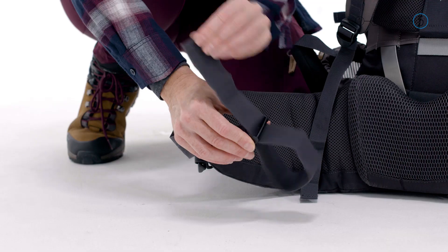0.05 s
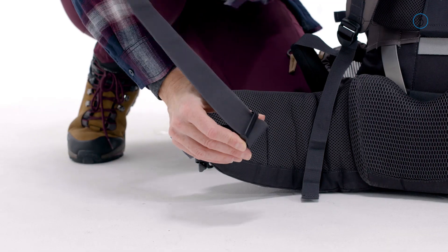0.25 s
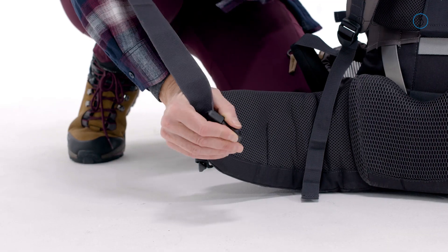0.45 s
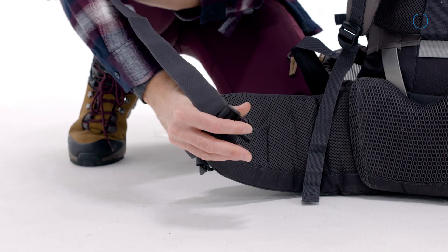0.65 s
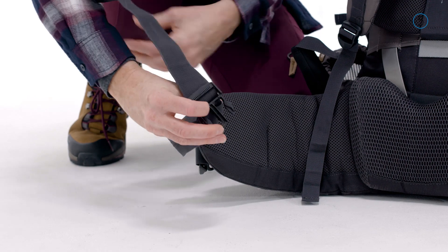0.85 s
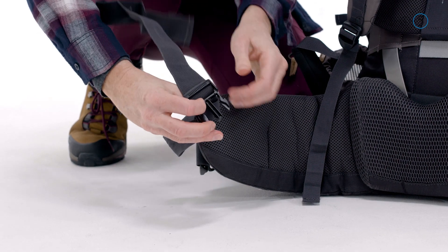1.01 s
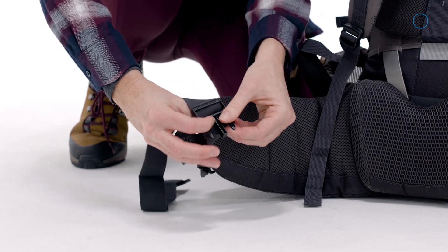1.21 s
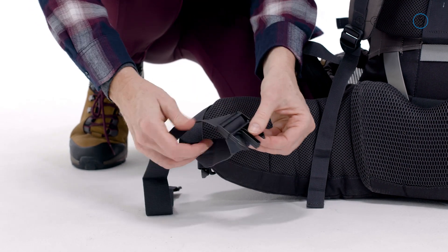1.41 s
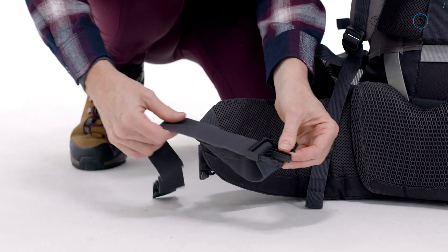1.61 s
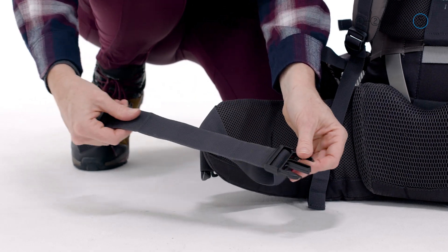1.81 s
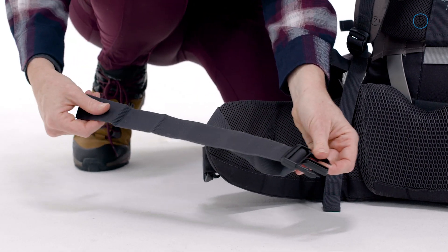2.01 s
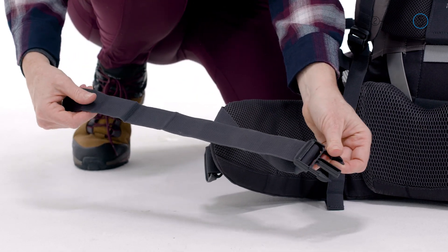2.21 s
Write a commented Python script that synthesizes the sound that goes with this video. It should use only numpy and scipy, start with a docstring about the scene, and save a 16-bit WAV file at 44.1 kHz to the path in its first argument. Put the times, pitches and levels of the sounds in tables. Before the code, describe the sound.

A nylon strap zips through a backpack's plastic buckle, rising in pitch. Dull knocks on padding and faint hand rustling follow, then a slacker pull rasps and ends in small buckle ticks, close by in a dry studio.

```python
"""First comes a quick zip that rises in pitch: a nylon strap pulled tight through the plastic buckle
of a backpack's hip belt, the ribs of its weave ticking over the bar. The strap end flops on the
padding, hands rustle, and a second, slacker pull only rasps and ends with small buckle ticks.
It all happens close by in a dry studio, over a low hum and hiss."""
import sys
import numpy as np
from scipy import signal
from scipy.fft import rfft, irfft
from scipy.io import wavfile
from scipy.ndimage import map_coordinates

SR = 44100
rng = np.random.default_rng(int(sys.argv[2]) if len(sys.argv) > 2 else 0)


def master_out(mix):
    """Clip the mix to full scale and print it as 16-bit PCM to the path in sys.argv[1]."""
    frames = np.transpose(np.atleast_2d(mix))
    ceiling = np.clip(frames, -1, 1)
    pcm = np.round(ceiling * 32767).astype(np.int16)
    wavfile.write(sys.argv[1], SR, pcm)


N = 103635


def undb(db):
    """Turn decibels into a gain."""
    return 10 ** (np.asarray(db) / 20)


def unit(x):
    """Scale a signal to an average power of 1."""
    return x / np.sqrt(np.mean(x ** 2))


def clock():
    """The time of each sample in seconds."""
    return np.arange(N) / SR


def gain_curve(table, column=1, fade_s=.012):
    """A gain that follows a table's dB column and fades out beyond its first and last times."""
    rows, t = np.array(table), clock()
    outside = np.maximum(rows[0, 0] - t, 0) + np.maximum(t - rows[-1, 0], 0)
    return undb(np.interp(t, rows[:, 0], rows[:, column])) * np.exp(-outside / fade_s)


def colour(x, points):
    """Shape the bass and treble along (Hz, dB) points; white noise keeps its power."""
    size = 4096
    hz, db = np.array(points).T
    gain = undb(np.interp(np.log(np.fft.rfftfreq(size, 1 / SR) + 1), np.log(hz), db))
    # These steps make a filter that never rings before the sound arrives.
    cepstrum = irfft(np.log(unit(gain)))
    cepstrum[1:size // 2] *= 2
    cepstrum[size // 2 + 1:] = 0
    return signal.fftconvolve(x, irfft(np.exp(rfft(cepstrum))))[:N]


def wander(per_s):
    """A smooth random curve, about 1 in size, through per_s new values a second."""
    values = rng.standard_normal(4096)
    return unit(map_coordinates(values, [clock() * per_s], order=2, mode="mirror"))


def fibres(spread_db, hiss, snaps_per_s=5000):
    """Many tiny fibre snaps of uneven size over a smooth hiss."""
    hits = rng.random(N) < snaps_per_s / SR
    signs = np.sign(rng.standard_normal(N))
    sizes = undb(spread_db * np.minimum(rng.exponential(size=N), 4))
    return unit(unit(hits * signs * sizes) + hiss * rng.standard_normal(N))


# The tone of the rumble and hiss. Each row: frequency in Hz, relative level in dB.
BACKGROUND_COLOUR = [(25, -15), (42, -9), (56, -6), (80, -4), (130, 0.5), (220, -5), (350, -10), (550, -17),
                     (900, -18), (2000, -18), (4000, -22), (8000, -20.5), (12000, -23), (15500, -20)]

def background(hum_hz=100, hum_db=-56.5, noise_db=-54.5):
    """A steady hiss, a low rumble and a slightly wavering hum."""
    hum_gain = np.sqrt(2) * undb(hum_db + 0.6 * wander(12))
    hum = hum_gain * np.sin(2 * np.pi * hum_hz * clock() + .25 * wander(9))
    return hum + undb(noise_db) * colour(rng.standard_normal(N), BACKGROUND_COLOUR)


# Early echoes off the floor and the pack. Each row: delay in seconds, level in dB.
ECHOES = [(.0037, -22), (.0078, -19), (0.0151, -16)]

def room(x, ring_s=.24, gap_s=.007, tail_db=-19, top_hz=5500):
    """Add a few quick echoes and a short, soft tail from the studio's floor and walls."""
    t = clock()
    early = sum(undb(db) * np.interp(t - delay, t, x, left=0) for delay, db in ECHOES)
    age = t[:SR // 2]
    tail = rng.standard_normal(len(age)) * (age > gap_s) * np.exp(-np.log(1000) * age / ring_s)
    tail = signal.sosfilt(signal.butter(1, top_hz, fs=SR, output="sos"), tail)
    tail /= np.sqrt(np.sum(tail ** 2))
    return x + early + undb(tail_db) * signal.fftconvolve(x, tail)[:N]


# Hands and sleeves on fabric. Each row: time in seconds, brushing level in dB, rubbing level in dB.
HANDLING = [(0.42, -54.5, -42.5), (0.51, -55.5, -52), (0.55, -55, -60.5), (0.64, -52.5, -53),
            (0.70, -57.5, -57.5), (0.81, -56, -61), (0.85, -60, -62), (0.90, -56, -61), (1.0, -65.5, -67),
            (1.11, -65, -61.5), (1.19, -66, -64), (1.228, -58, -63), (1.26, -63, -58.5), (1.33, -55, -58),
            (1.41, -54.5, -54.5), (1.43, -50, -57.5), (1.50, -50.5, -54), (1.555, -45.5, -58),
            (1.615, -49.5, -59.5), (1.672, -42.5, -56), (1.705, -50.5, -55), (1.80, -51, -63)]
# The tones of bright brushing and dull rubbing. Each row: frequency in Hz, relative level in dB.
BRUSH_COLOUR = [(80, -12), (150, 3.5), (300, -7), (1000, -3.5), (1700, 0.5), (2400, 0), (3600, -3),
                (6500, -9), (10000, -17), (15500, -22.5)]
RUB_COLOUR = [(60, -25), (150, -7), (310, 0), (500, -2), (750, -1), (1150, -2), (1700, -14), (4000, -35)]

def hands():
    """Fingers brush along the strap while sleeves and padding rub more dully."""
    brush = fibres(spread_db=2.5, hiss=0.95) * undb(1.24 * wander(80)) * gain_curve(HANDLING)
    rub = fibres(spread_db=3.5, hiss=0.44) * undb(1.5 * wander(59.8)) * gain_curve(HANDLING, column=2)
    return colour(brush, BRUSH_COLOUR) + colour(rub, RUB_COLOUR)


# Brief squeaks. Each row: middle in seconds, level in dB, pitch in Hz, half length in seconds,
# wobble as a share of the pitch.
SQUEAKS = [(0.899, -52.5, 2300, 0.0063, 0.18), (1.551, -47, 2400, 0.008, 0.07),
           (2.093, -54, 13800, .009, 0.05), (2.19, -59, 13300, .006, .02), (2.26, -53.5, 2150, 0.013, .03)]

def squeaks():
    """The strap sticks and slips on the plastic in thin, unsteady chirps."""
    out, waver = np.zeros(N), wander(1100)
    for middle, db, hz, half, wobble in SQUEAKS:
        swell = np.sqrt(2) * undb(db) * np.exp(-((clock() - middle) / half) ** 2)
        out += swell * np.sin(2 * np.pi * hz * np.cumsum(1 + wobble * waver) / SR)
    return out


# Ticks of the buckle. Each row: start in seconds, level in dB, fading time in seconds.
TICKS = [(0.072, -38, 0.0019), (1.839, -40, .002), (2.092, -35.5, .005), (2.183, -44, .006),
         (2.232, -39.5, .003), (2.2775, -41, 0.015), (2.322, -48, .003)]
# The tone of the ticks. Each row: frequency in Hz, relative level in dB.
TICK_COLOUR = [(150, -10), (800, 0), (2000, -1), (4000, -5), (7000, -6), (10000, -16), (16000, -26)]

def buckle_ticks():
    """The buckle shifts and snags in short crackles."""
    t, bursts = clock(), np.zeros(N)
    for start, db, fade_s in TICKS:
        bursts += undb(db) * (t > start) * np.exp(-np.maximum(t - start, 0) / fade_s)
    return colour(bursts * fibres(spread_db=3, hiss=.6), TICK_COLOUR)


# Strap and buckle knock on the padded belt. Each row: start in seconds, level in dB, pitch in Hz,
# ring time (seconds to fall by 60 dB), base level of the cloth slap in dB.
THUMPS = [(0.396, -27.5, 243, 0.049, -51), (0.412, -25.5, 330, 0.04, -40), (0.490, -33, 400, 0.042, -34.5),
          (0.503, -34.5, 345, 0.07, -45), (0.5928, -12.5, 283, 0.033, -31), (0.606, -40, 172, 0.027, -40),
          (0.6205, -24.5, 260, 0.038, -39), (0.64, -31, 250, 0.033, -54), (1.102, -36.5, 230, 0.042, -54),
          (1.125, -38, 190, .03, -64)]
# The belt's tones. Each row: multiple of the pitch, relative level in dB, multiple of the ring time.
BELT_TONES = [(.6, -16.5, 1.5), (1, 0, 1), (1.4, -16, 0.45), (3.1, -15, .45), (4.2, -22, .4)]
# The tone of the cloth slap. Each row: frequency in Hz, relative level in dB.
SLAP_COLOUR = [(60, -42), (200, -18), (450, 4.5), (900, 8), (1250, 0.5), (1700, -4.5), (3000, -20),
               (6000, -21), (15000, -26)]

def thumps(rise_s=.003, rustle_s=.004):
    """Each knock rings the padded belt briefly; the cloth gives a dull click and a short rustle."""
    belt, slap, noise = np.zeros(N), np.zeros(N), rng.standard_normal(N)
    for start, db, hz, ring_s, slap_db in THUMPS:
        age = np.maximum(clock() - start, 0)
        rise = 1 - np.exp(-age / rise_s)
        for multiple, tone_db, stretch in BELT_TONES:
            fade = np.exp(-np.log(1000) * age / (ring_s * stretch))
            belt -= undb(db + tone_db) * rise * fade * np.sin(2 * np.pi * hz * multiple * age)
        slap += undb(slap_db - 8) * noise * (age > 0) * np.exp(-age / rustle_s)  # the rustle
        slap[int(start * SR)] -= undb(slap_db + 15)  # the click
    return belt + colour(slap, SLAP_COLOUR)


# The second pull. Each row: time in seconds, rasp level in dB, level of the low scrape in dB.
SLACK_PULL = [(1.70, -69, -60), (1.765, -46.5, -50.5), (1.79, -36, -48), (1.82, -37, -48),
              (1.84, -34.5, -46), (1.875, -37, -47), (1.915, -43.5, -47.5), (1.96, -43.5, -49),
              (2.026, -39, -39.5), (2.055, -41.5, -45.5), (2.096, -44.5, -41.5), (2.125, -47.5, -52.5),
              (2.16, -50.5, -53), (2.19, -48, -52.5), (2.22, -51.5, -66), (2.265, -50.5, -54),
              (2.295, -49.5, -56), (2.35, -57, -54)]
# The tone of its rasp. Each row: frequency in Hz, relative level in dB.
SLACK_COLOUR = [(100, -20), (300, -12), (650, -7), (1000, -3), (1550, 0), (2300, -1), (2600, -6),
                (3300, -4), (4600, -9), (7000, -11), (10000, -21), (15500, -29)]

def slack_pull():
    """The slacker strap rasps unevenly through the buckle and scrapes lower as it slows."""
    catch = undb(0.65 * wander(140))
    rasp = fibres(spread_db=2, hiss=1.0) * catch * gain_curve(SLACK_PULL)
    scrape = fibres(spread_db=2.5, hiss=.4) * catch * gain_curve(SLACK_PULL, column=2)
    return colour(rasp, SLACK_COLOUR) + colour(scrape, RUB_COLOUR)


def rib_tones(tones, rib_rate, phase, strap_hz=720, width_hz=110, boost_db=9):
    """The ribs' flickering tones, each louder near the pitch at which the tight strap rings."""
    out = np.zeros(N)
    for multiple, db in tones:
        boost = boost_db / (1 + (2 * (multiple * rib_rate - strap_hz) / width_hz) ** 2)
        flicker_db = 2 * wander(139)
        out += np.sqrt(2) * undb(db + boost + flicker_db) * np.cos(multiple * phase)
    return out


# The first pull's zip. Each row: time in seconds, ribs crossing the bar per second, base level in dB.
ZIP = [(0.015, 217, -61), (0.04, 250, -57), (0.055, 286, -60), (0.072, 305.8, -47), (0.10, 271.3, -53),
       (0.15, 210.5, -56), (0.18, 253.4, -52.5), (0.205, 299.2, -45.5), (0.235, 394.3, -45),
       (0.255, 542, -41.5), (0.272, 676.7, -47), (0.286, 697, -30.5), (0.297, 747.2, -39),
       (0.324, 745, -40.5), (0.342, 770, -60), (0.365, 754, -43.5), (0.388, 731, -69), (0.405, 715, -89)]
# The zip's tones, and extra ones at speed, when every other rib catches harder.
# Each row: multiple of the rib rate, relative level in dB.
ZIP_TONES = [(1, 1.5), (2, -5.5), (3, -8), (4, -29)]
FAST_TONES = [(0.5, -47), (1.5, -39.5)]
# The rasp of the fibres in this pull. Each row: time in seconds, level in dB.
TIGHT_RASP = [(0, -51), (0.04, -42), (0.08, -44), (0.12, -45), (0.164, -47), (0.232, -37.5), (0.266, -31.5),
              (0.29, -31), (0.326, -29), (0.358, -29), (0.388, -37), (0.42, -40), (0.437, -52), (0.48, -53),
              (0.56, -76)]
# The tone of that rasp. Each row: frequency in Hz, relative level in dB.
TIGHT_COLOUR = [(100, -22), (250, -12.5), (400, -6.5), (600, -10), (900, -3), (1350, 0), (2200, 0),
                (3000, -3), (4300, -5), (7400, -13), (10000, -22), (15500, -31)]

def tight_pull(steady_hz=705, fast_from_s=0.271, fast_to_s=0.399, fade_s=0.033):
    """Ribs of the weave tick over the bar and ring the tight strap: a rising zip with a rasp."""
    t, rows = clock(), np.array(ZIP)
    rib_rate = np.interp(t, rows[:, 0], rows[:, 1])
    wobble = 0.0099 + 0.14 * np.clip(1 - rib_rate / steady_hz, 0, 1)  # a slow strap moves in jerks
    phase = 2 * np.pi * np.cumsum(rib_rate * (1 + wobble * wander(260))) / SR
    fast = np.clip(np.minimum(t - fast_from_s, fast_to_s - t) / fade_s, 0, 1)
    tone = gain_curve(ZIP, column=2) * rib_tones(ZIP_TONES, rib_rate, phase)
    tone += fast * rib_tones(FAST_TONES, rib_rate, phase)
    pulse = 1 + 0.32 * np.cos(phase)  # the rasp swells once for each rib
    rasp = unit(fibres(spread_db=3.0, hiss=1.8) * pulse * undb(0.47 * wander(130)))
    return tone + colour(rasp * gain_curve(TIGHT_RASP), TIGHT_COLOUR)


def scene():
    """All the sounds meet at one microphone; the knocks reach it without echoes."""
    strap_sounds = tight_pull() + slack_pull() + hands() + buckle_ticks() + squeaks()
    return (room(strap_sounds) + thumps() + background())[None]


def record(dry, bottom_hz=50, top_hz=15750):
    """Cut the deep bass and the highest treble."""
    x = signal.sosfilt(signal.butter(6, bottom_hz, "high", fs=SR, output="sos"), dry)
    return signal.sosfilt(signal.ellip(10, .1, 70, top_hz, fs=SR, output="sos"), x)


dry = scene()
out = record(dry)
master_out(out)
```